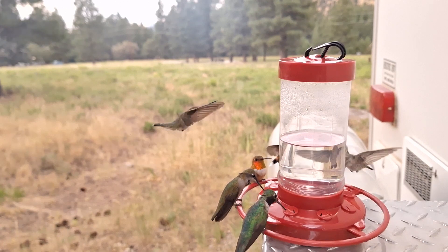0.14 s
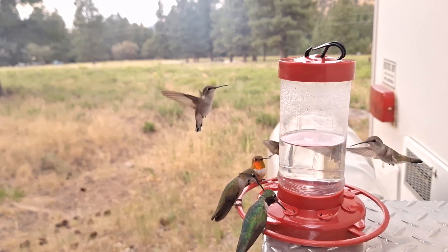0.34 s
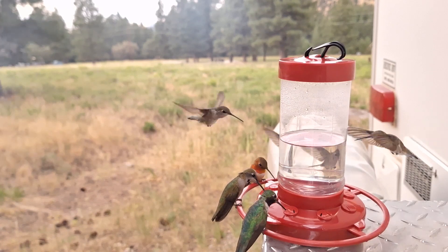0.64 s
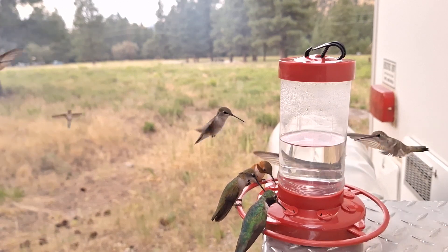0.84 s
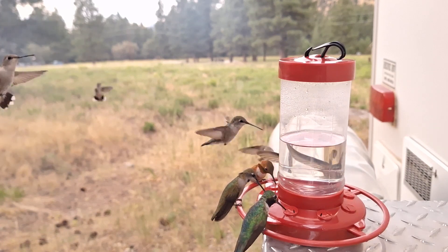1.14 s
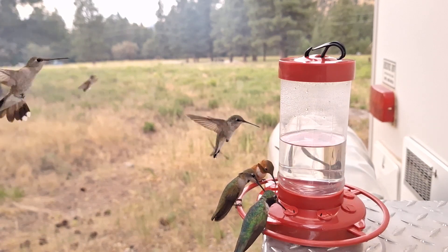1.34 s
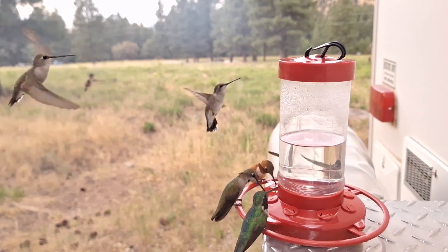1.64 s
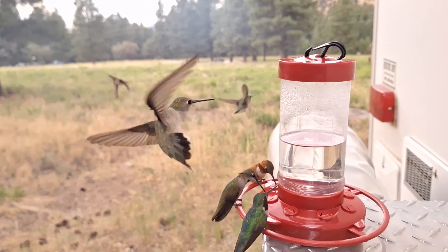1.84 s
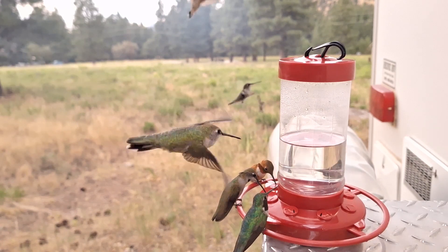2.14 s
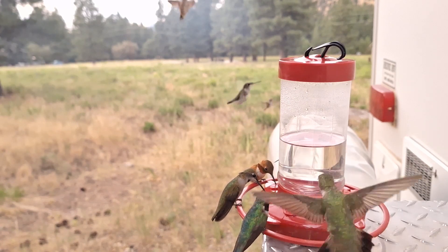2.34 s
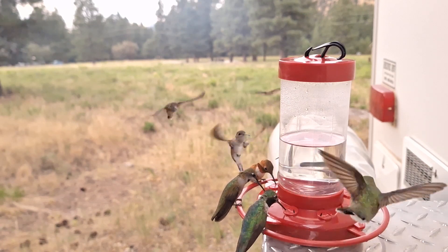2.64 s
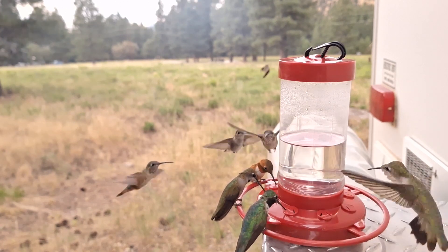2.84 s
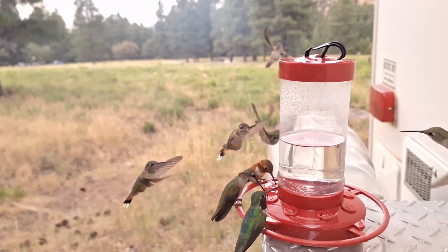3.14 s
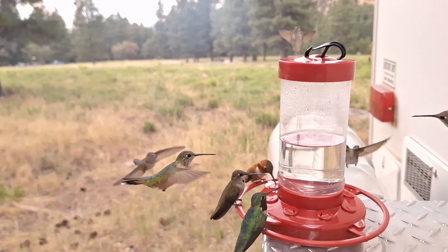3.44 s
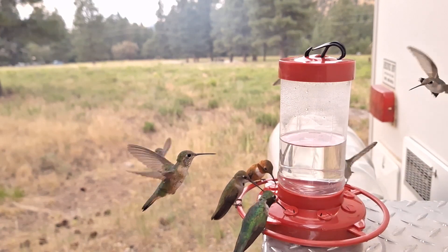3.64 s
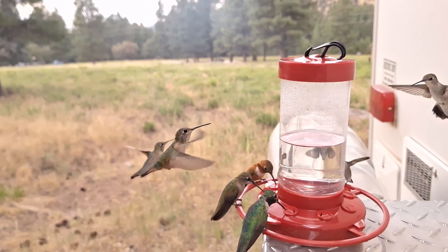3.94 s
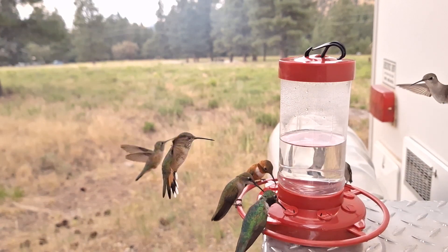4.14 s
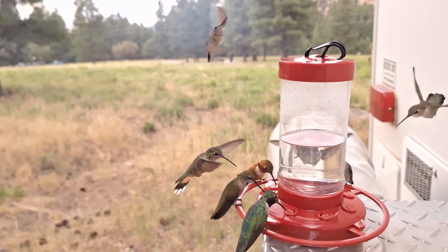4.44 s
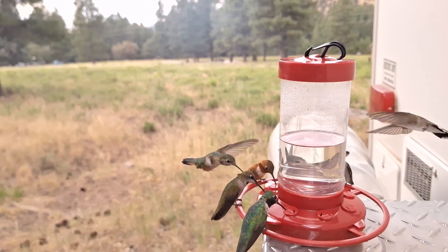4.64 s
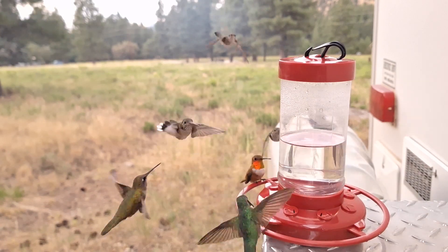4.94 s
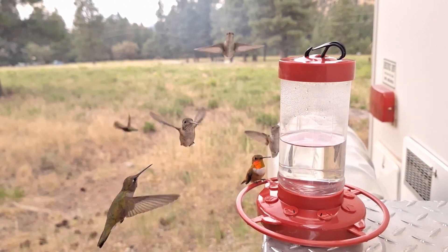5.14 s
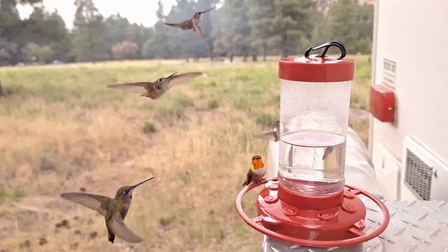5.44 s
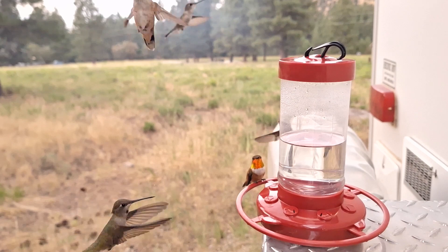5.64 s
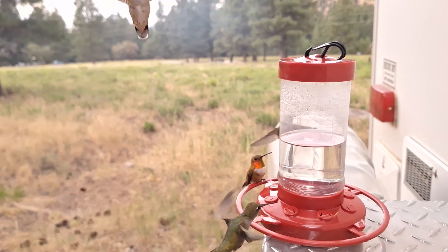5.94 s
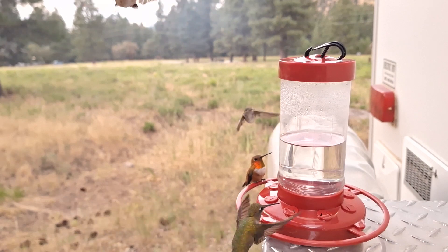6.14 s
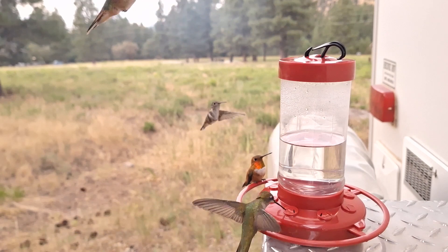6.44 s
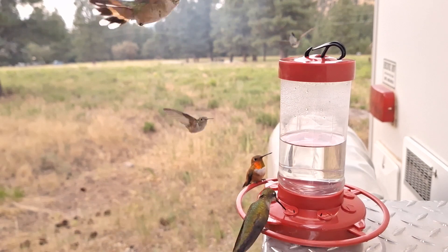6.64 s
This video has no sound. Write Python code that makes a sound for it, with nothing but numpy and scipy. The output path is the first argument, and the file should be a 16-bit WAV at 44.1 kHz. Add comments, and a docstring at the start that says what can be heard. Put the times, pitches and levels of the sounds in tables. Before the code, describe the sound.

Outdoors, a close microphone by a feeder catches overlapping hummingbird wings: low buzzing drones, throbbing bass flutters and puffs of turbulent air. A small wing tick comes early. Tiny piercing chips, each plunging in pitch, mix with duller reedy chups. A dry rattle of striking feathers leads into a bright, high whirring trill that starts abruptly and recedes with slight echo. Faint distant whistles and a gentle meadow hiss lie behind.

```python
"""Hummingbirds at a feeder

Hummingbirds crowd a feeder beside a meadow: wings hum at twice their beat and throw gusts of turbulent air.
The birds scold with whistled chips of plunging pitch and lower, reedy chups rich in harmonics.
Wings flick early on and later clash in a scuffle; a male then flies by, his wingtip feathers
whistling on every beat. Faint whistles sound farther off, over feather hiss and a steady meadow hiss."""
import sys
import numpy as np
from scipy import signal
from scipy.fft import rfft, irfft, next_fast_len
from scipy.io import wavfile
from scipy.ndimage import uniform_filter1d

SR = 44100
rng = np.random.default_rng(int(sys.argv[2]) if len(sys.argv) > 2 else 0)


def master_out(mix):
    """Clip the mix to full scale and print it as 16-bit PCM to the path in sys.argv[1]."""
    frames = np.transpose(np.atleast_2d(mix))
    ceiling = np.clip(frames, -1, 1)
    pcm = np.round(ceiling * 32767).astype(np.int16)
    wavfile.write(sys.argv[1], SR, pcm)


N = 298998
TIME = np.arange(N) / SR  # seconds
TAU = 2 * np.pi
SIDES = np.array([[1], [-1]])  # left port, right port
EDGE_HZ = 15900  # upper limit of the band


def hover(hum_db=-4.0, arrive_s=0.043, leave_s=0.0753, slowing=0.044, waiting_db=-48, waiting_hz=90.94):
    """Incoherent sources add in power; the hum takes their power-weighted pitch, so the nearest bird rules."""
    # Birds hovering close by. Each row: arrival in seconds, stay in seconds, level in dB before the
    # hum gain, hum pitch in Hz at mid-stay.
    visit_rows = [(.01, 0.42, -45.5, 91), (0.491, 0.38, -40, 83.8), (1.069, 0.19, -37.5, 96.83),
                  (1.68, 0.29, -36, 87.85), (1.879, 0.32, -39, 95.15), (2.189, 0.69, -39.5, 92.3),
                  (2.949, 0.43, -39.5, 93.33), (3.456, 0.32, -35, 91.6), (3.76, 0.39, -42, 86.6),
                  (4.26, 0.49, -39, 88.04), (4.699, 0.33, -34.5, 86.46), (5.001, 0.95, -39.5, 86.53),
                  (6.04, 0.6, -39, 84.33)]
    # one bird waits its turn farther off throughout
    power = np.full(N, amp(waiting_db) ** 2)
    pitch_sum = power * waiting_hz
    for start, stay, db, mid_hz in visit_rows:
        t = TIME - start
        near_power = (amp(db) * ramps(t, stay, arrive_s, leave_s)) ** 2
        # the wingbeat slows by this share over the stay
        pitch = mid_hz * (1 + slowing * (.5 - t / stay))
        power = power + near_power
        pitch_sum = pitch_sum + near_power * pitch
    return amp(hum_db) * np.sqrt(power) * hum(pitch_sum / power)


def hum(hz, beat_db=-14, upper_db=-13, fall_db=5, rival_db=-7, flutter_db=4.0, wander=0.03494):
    """Near-equal up- and downstrokes double the beat frequency; a rival's lower hum interferes with it."""
    beat = np.pi * np.cumsum(hz * (1 + wander * drift(9.7))) / SR  # phase of the wingbeat, half the hum
    rival = TAU * np.cumsum(hz * (.84 + .1 * drift(5))) / SR + .5 * SIDES * drift(2)
    wave = np.cos(2 * beat) + amp(beat_db) * np.cos(beat + drift(1.5)) + amp(rival_db) * np.cos(rival)
    # upper harmonics of the beat, strongest at the fourth
    for k in range(3, 8):
        wave += amp(upper_db - fall_db * abs(k - 4)) * np.cos(k * beat + drift(10.8))
    return np.sqrt(2) * amp(flutter_db * drift(34.2)) * wave


def flock(wings_db=1, wander=.06, swell_db=3, air_db=-9.0, puff=0.19):
    """Periodic wing pressure forms a harmonic series; each stroke also modulates turbulent air noise."""
    # The rest of the flock. Each row: time in seconds, level in dB before the wing or air gain.
    level_rows = [(0.0, -41.5), (0.94, -46), (1.47, -49.5), (2.81, -43), (2.87, -49), (3.12, -41),
                  (4.06, -51), (4.7, -44), (4.83, -36.5), (4.97, -44.5), (5.67, -47.5), (6.25, -45),
                  (6.78, -52)]
    # Wingbeat of each of these birds, in Hz.
    beat_rates = [40.15, 43.65, 45.83, 50.95]
    # A wing's pressure wave. Each row: multiple of the wingbeat, relative level in dB.
    wing_harmonics = [(1, -3), (2, 3), (4, -6.5), (14, -29.5)]
    # Spectrum of the fanned air. Each row: frequency in Hz, relative density in dB per Hz.
    air_spectrum = [(30, 1), (130, 22), (500, 5), (800, -3), (1400, -8.5), (2600, -16), (4500, -13.5)]
    level_db, = curve(level_rows)
    wings, puffs = silence(), np.zeros(N)
    for hz in beat_rates:
        beat = TAU * np.cumsum(hz * (1 + wander * drift(4))) / SR
        bearing = 0.39 * drift(0.91) * SIDES  # phase difference between ports as the bird turns
        wave = 0
        for k in range(1, 11):
            wave = wave + amp(read(wing_harmonics, k)) * np.cos(k * beat + drift(15.0) + bearing)
        wings += wave * amp(swell_db * drift(9.5))
        puffs += np.cos(2 * beat) + np.cos(beat)
    air = noise(air_spectrum) * np.exp(puff * evened(puffs))
    return amp(level_db + wings_db) * evened(wings) + amp(level_db + air_db) * air


def swerves(half_s=0.053, stroke_hz=92, puff=0.53, level_db=-1):
    """Turbulence shed in a hard turn is a short noise burst, amplitude-modulated by the wing strokes."""
    # Swerving birds. Each row: centre in seconds, level in dB before the gust gain.
    swerve_rows = [(.96, -56.5), (1.13, -51), (1.914, -51), (2.322, -51), (2.7, -64), (3.551, -54.5),
                   (4.841, -63)]
    # Spectrum of a gust. Each row: frequency in Hz, relative density in dB per Hz.
    gust_spectrum = [(60, -30), (180, 3), (420, 9.5), (800, -10.5), (2500, -17.5)]
    gusts = sum(amp(db) * np.exp(-((TIME - s) / half_s) ** 2) for s, db in swerve_rows)
    strokes = evened(np.exp(puff * np.cos(TAU * stroke_hz * TIME + drift(6.7))))
    return amp(level_db) * gusts * strokes * noise(gust_spectrum)


def passes(beat_hz=45, second_db=-9, third_db=-8):
    """In the near field of a wing, the fundamental of each whole beat outweighs its harmonics."""
    # Birds brushing past the microphone. Each row: centre in seconds, half length in seconds,
    # level in dB of the fundamental.
    pass_rows = [(2.34, 0.11, -48), (2.685, 0.83, -45), (3.216, 0.16, -48), (6.201, 0.33, -40.5)]
    beat = TAU * beat_hz * TIME + 0.91 * drift(16.4) + 0.081 * SIDES
    nearness = sum(amp(db) * np.exp(-((TIME - s) / half) ** 2) for s, half, db in pass_rows)
    wave = np.cos(beat) + amp(second_db) * np.sin(2 * beat) + amp(third_db) * np.cos(3 * beat)
    return np.sqrt(2) * nearness * wave


def chips(level_db=0.0, rise=0.0015, fade=0.023, step_db=8.5, bloom=0.0046, rasp=0.29, shimmer_db=5.0,
          breath_db=-13, knee_hz=5000, low_hz=2450, plunge_s=0.0029, glide_s=0.012):
    """Frequency modulation: a breathy whistle plunges to a knee, then glides lower; harmonics bloom after onset."""
    # Each row: start in seconds, level in dB before colouring, overtone level in dB,
    # starting pitch in Hz, length in seconds.
    chip_rows = [(0.0155, -51.5, -5.5, 8010, 0.039), (0.14, -57.5, -5, 6010, 0.03),
                 (0.751, -54.5, -3, 7400, 0.037), (1.661, -56, -3.5, 5588, .026),
                 (1.84, -58, -2.5, 6940, 0.028), (2.045, -51, -3, 7463, .026), (2.287, -48, -4, 7900, .028),
                 (2.3099, -42, -10, 7530, 0.021), (2.547, -53.5, -1.5, 5400, 0.026),
                 (2.581, -55.5, -13, 8057, 0.031), (2.649, -52.5, -2, 8400, 0.032),
                 (2.922, -50, -4.5, 8630, 0.028), (3.02, -55.5, -1.5, 7517, 0.027),
                 (3.205, -48, -5.5, 5892, 0.024), (3.508, -49.5, -2.5, 5865, .019),
                 (3.625, -52.5, -7, 7500, 0.031), (3.654, -45.5, -22, 6460, 0.025),
                 (3.977, -55.5, -1.5, 6318, .018), (4.205, -56.5, -11, 7560, 0.037),
                 (4.236, -48, -12.5, 8034, 0.03), (4.407, -49, -1.5, 6362, 0.017),
                 (5.201, -53.5, -11, 7980, 0.023), (6.6955, -48, -2.5, 8833, 0.027)]
    out = silence()
    for s, db, overtone_db, top_hz, length in chip_rows:
        t = port_times(length)
        plunge = (top_hz - knee_hz) / (1 + (t / plunge_s) ** 2)
        glide = (knee_hz - low_hz) * np.exp(-t / glide_s)
        hz = low_hz + glide + plunge
        turn = TAU * np.cumsum(hz * np.gradient(t, axis=1), axis=1) + rasp * quiver(t, size=24)
        overtones = 0
        for i, k in enumerate(range(2, 6)):
            level = amp(overtone_db - step_db * i + shimmer_db * quiver(t))
            overtones = overtones + level * np.sin(k * turn) * (k * hz < EDGE_HZ)
        breath = amp(breath_db) * rng.standard_normal(t.shape)
        wave = np.sin(turn) + np.minimum(t / bloom, 1) * overtones + breath
        add(out, s, glance(amp(db + level_db) * ramps(t, length, rise, fade) * wave))
    return colour(out, [(2400, -6), (4200, 4.5), (6000, 8.0), (8500, 11.5), (15000, 4.5)])


def chups(level_db=0.5, length=.02, rise=0.0029, fade=0.0024, sag=0.188, rasp=0.11, shimmer_db=4.0,
          breath_db=-10):
    """A reedy source is a harmonic series of uneven strength, here with breath noise and a drooping pitch."""
    # Each row: time in seconds, level in dB before the chup gain, starting pitch in Hz,
    # overtone level in dB.
    chup_rows = [(0.027, -54.5, 1977, -3.5), (.125, -55, 1877, -2), (0.607, -55.5, 1948, 0),
                 (.992, -53.5, 2072, -7.5), (1.081, -57.5, 1873, -2), (1.717, -61.5, 1840, 3.5),
                 (1.815, -64.5, 1897, 3), (2.213, -67.5, 1813, -6), (2.427, -59, 1949, 0.5),
                 (2.533, -56.5, 1945, -3), (3.159, -52.5, 1933, -5.5), (5.851, -56.5, 2040, -3.5),
                 (5.961, -56.5, 2070, -2.5)]
    # Relative levels in dB of the overtones, from the second harmonic up.
    reed_levels = [2, 3.5, 0.5, -5, -4]
    out = silence()
    for s, db, hz, overtones_db in chup_rows:
        t = port_times(length)
        # pitch falls with the square of time, by the share sag at the end
        turn = TAU * hz * t * (1 - sag / 3 * (t / length) ** 2) + rasp * quiver(t, size=20)
        reed = sum(amp(d + shimmer_db * quiver(t)) * np.sin(k * turn) for k, d in enumerate(reed_levels, 2))
        breath = amp(breath_db) * rng.standard_normal(t.shape)
        wave = np.sin(turn) + amp(overtones_db) * (reed + breath)
        add(out, s - .002, glance(amp(db + level_db) * ramps(t, length, rise, fade) * wave))
    return out


def trill(level_db=-1, octave_db=-28, lean_db=3.0, breath_db=-21):
    """Aeroelastic flutter: narrow wingtip feathers snap into a whistle, rising in pitch, once a wingbeat."""
    # The male's flight. Each row: time in seconds, whistle level in dB before the gains.
    flight_rows = [(5.158, -63), (5.2, -31.5), (5.38, -36.5), (5.55, -41), (5.62, -48), (5.75, -44.5),
                   (6.12, -60.5), (6.28, -50.5), (6.7, -65)]
    # The whistle through one beat. Each row: share of the beat, relative level in dB, pitch in Hz.
    stroke_rows = [(0, -16, 5790), (.05, 5, 5730), (.22, 3.5, 5810), (.4, -3, 6210), (.62, -14, 6080),
                   (1, -16, 5790)]
    # His wingbeat. Each row: time in seconds, rate in Hz.
    beat_rows = [(5.1575, 45), (5.3, 42.2), (5.55, 42.7), (6.0, 44.6), (6.2, 41.5)]
    db, = curve(flight_rows)
    flying = (TIME > flight_rows[0][0]) & (TIME < flight_rows[-1][0])
    beat_hz, = curve(beat_rows)
    beats = np.cumsum(beat_hz * (TIME > beat_rows[0][0])) / SR
    stroke_db, hz = curve(stroke_rows, beats % 1)
    turn = TAU * np.cumsum(hz * (1 + .015 * quiver(TIME))) / SR + SIDES * (.89 + .3 * drift(10))
    breath = noise([(6200, -2), (10000, -15)])
    whistle = np.sin(turn) + amp(octave_db) * np.sin(2 * turn) + amp(breath_db) * breath
    wave = flying * whistle * amp(level_db + stroke_db + 1.0 * drift(32))
    # the feathers give off little below their lowest flutter pitch
    wave = colour(wave, [(4900, -30), (5500, 0)])
    # the echo fades half as fast, in dB, as he leaves
    echo = surroundings(wave * amp((db + db.max()) / 2), near_db=-15.5, far_db=-18)
    return wave * amp(db + lean_db * SIDES) + echo


def flicks(tick_s=.00082, thwack_s=0.00073, scrape_db=-17, scrape_s=0.032, crackle_db=5):
    """Impact and friction: stiff feathers snap past each other with tick and thwack, then scrape as they part."""
    # Wings striking each other. Each row: time in seconds, bright tick level in dB,
    # dull thwack level in dB.
    flick_rows = [(0.198, -44, -53.5), (4.816, -45.5, -46.5), (4.837, -54, -39.5), (4.860, -35.5, -40),
                  (4.874, -41.5, -49), (4.912, -36.5, -43.5)]
    out, t = silence(), TIME[:4000]
    for s, db, thwack_db in flick_rows:
        tick, body = rng.standard_normal((2, 2, len(t)))
        tick = evened(colour(tick, [(1000, -16), (8000, 11)])) * t / tick_s * np.exp(1 - t / tick_s)
        body = evened(colour(body, [(300, 6), (900, 11), (2400, 3), (8000, -26)]))
        thwack = t / thwack_s * np.exp(1 - t / thwack_s)
        scrape = amp(scrape_db) * evened(amp(crackle_db * quiver(t))) * np.exp(-t / scrape_s)
        add(out, s, amp(db) * tick + amp(thwack_db) * body * (thwack + scrape))
    return out


def far_trills(beat_hz=50, level_db=-7, sag_hz_per_s=600):
    """Other birds' feathers pipe in pulses at the wingbeat: a sagging tone, amplitude-modulated."""
    # Each row: start in seconds, end in seconds, starting pitch in Hz, level in dB before the gain.
    far_rows = [(1.146, 1.285, 2233, -58), (4.972, 5.502, 3962, -60)]
    out = silence()
    for s, end, hz, db in far_rows:
        t = port_times(end - s)
        turn = TAU * (hz - .5 * sag_hz_per_s * t) * t
        pulses = np.exp(2.5 * np.cos(TAU * beat_hz * t) + .25 * quiver(t, size=300))
        wave = evened(pulses * np.sin(turn + quiver(t, size=85)))
        swell = np.sin(np.pi * np.sqrt(t / (end - s)))  # quick rise, slower fade
        add(out, s, amp(db + level_db) * wave * swell)
    return out


def hiss(feather_db=4, meadow_db=-71, flicker_db=2.5):
    """Broadband noise: flickering treble hiss from feathers over the steady hiss of the meadow."""
    # Feather hiss. Each row: time in seconds, level in dB before the feather gain.
    feather_rows = [(0, -72), (1.55, -75.5), (2.1, -70.5), (4.9, -66.5), (5.5, -71.5), (6.4, -66.5),
                    (6.78, -71)]
    # Spectrum of the meadow. Each row: frequency in Hz, relative density in dB per Hz.
    meadow_spectrum = [(200, 17.5), (1000, 0), (2700, -2.5), (10000, -32)]
    db, = curve(feather_rows)
    fine = noise([(2000, -64), (5000, -9.5), (8500, -1.5), (15500, 3.5)])
    feathers = fine * amp(db + feather_db + flicker_db * drift(41))
    return feathers + amp(meadow_db) * noise(meadow_spectrum)


def surroundings(x, near_db, far_db, near_t60=0.17, far_t60=0.41):
    """Exponentially decaying reverberation: quick scatter from feeder and wall, then a faint outdoor tail."""
    t = np.arange(SR // 2) / SR
    near, far = rng.standard_normal((2, 2, len(t)))
    scatter = amp(near_db) * evened(near * amp(-60 * t / near_t60))
    tail = amp(far_db) * evened(far * amp(-60 * t / far_t60))
    return signal.fftconvolve(x, (scatter + tail) / np.sqrt(len(t)), axes=1)[:, :N]


def glance(wave, db=-12, count=3, longest_s=.004):
    """Comb filtering: delayed reflections off bottle and wall make a call ripple as its pitch falls."""
    wave = np.pad(wave, [(0, 0), (0, round(longest_s * SR))])
    delays = rng.integers(1, round(longest_s * SR), (len(SIDES), count))
    reflections = [sum(np.roll(x, d) for d in row) for x, row in zip(wave, delays)]
    return wave + amp(db) * np.array(reflections)


def port_times(length, spread=.00007):
    """Interaural-style delay: the time at each port, in seconds, for a bird in a random direction."""
    return np.maximum(np.arange(0, length, 1 / SR) + SIDES * spread * rng.uniform(-1.5, 1), 0)


def noise(points):
    """Partial coherence: coloured noise at two ports, alike in the bass and unrelated in the treble."""
    # Each row: frequency in Hz, likeness of the ports (limited to 1 below).
    likeness = [(80, 3), (250, 1.17), (1100, 0.02)]
    size = next_fast_len(N)
    hz = np.fft.rfftfreq(size, 1 / SR)
    a, b = rfft(rng.standard_normal((2, size)))
    same = np.clip(read(likeness, hz), -1, 1)
    ports = np.array([a, same * a + np.sqrt(1 - same ** 2) * b])
    return evened(irfft(ports * amp(read(points, hz)), size)[:, :N])


def colour(x, points):
    """Linear filtering: multiplies the spectrum by a gain curve in dB."""
    size = next_fast_len(x.shape[-1] + 2000)
    gain = amp(read(points, np.fft.rfftfreq(size, 1 / SR)))
    return irfft(rfft(x, size) * gain, size)[..., :x.shape[-1]]


def drift(rate):
    """Low-passed random wander of rms 1, with its corner at rate in Hz."""
    hz = np.fft.rfftfreq(2048, TIME[-1] / 2047)
    slow = irfft(rfft(rng.standard_normal(2048)) / (1 + (hz / rate) ** 4))
    return np.interp(TIME, np.linspace(0, TIME[-1], len(slow)), evened(slow))


def quiver(t, size=60):
    """Twice-averaged noise of rms 1: fast unsteadiness over the times t, smoothed over size samples."""
    once = uniform_filter1d(rng.standard_normal(t.shape[-1]), size)
    return evened(uniform_filter1d(once, size))


def ramps(t, length, rise, fade):
    """Amplitude envelope of linear attack, hold and linear release."""
    return np.clip(t / rise, 0, 1) * np.clip((length - t) / fade, 0, 1)


def amp(db):
    """Decibel law: the amplitude ratio of a level in dB."""
    return 10 ** (np.asarray(db) / 20)


def evened(x):
    """Power normalisation: scales to rms 1."""
    return x / np.sqrt(np.mean(x ** 2) + 1e-20)


def curve(rows, at=TIME):
    """Linear interpolation of each column of a table over its first."""
    s, *columns = np.transpose(rows)
    return [np.interp(at, s, c) for c in columns]


def read(points, hz):
    """Linear interpolation of a spectrum on a log-frequency axis."""
    f, value = np.transpose(points)
    return np.interp(np.log(hz + 1), np.log(f + 1), value)


def silence():
    """Zero pressure at both ports."""
    return np.zeros((len(SIDES), N))


def add(mix, s, sound):
    """Superposition: adds a sound to the mix from s seconds on."""
    part = mix[:, max(round(s * SR), 0):][:, :sound.shape[-1]]
    part += sound[..., :part.shape[1]]


def scene():
    """Superposition of direct sound and echo: voices return dulled; distant whistles carry more echo."""
    voices, distant = chips() + chups() + flicks(), far_trills()
    echoes = colour(surroundings(voices, near_db=-8.5, far_db=-22.0), [(4000, 3.5), (9000, -7.0)])
    echoes += surroundings(distant, near_db=-9, far_db=-5)
    wings = hover() + flock() + swerves() + passes()
    return wings + hiss() + trill() + voices + distant + echoes


def record(dry):
    """Frequency response: each port has its own colour, then a bass cut and a band limit."""
    # Each row: frequency in Hz, left-right difference in dB.
    port_lean = [(200, 0.54), (6200, 3.5), (9500, -3.5)]
    dry = dry * signal.windows.tukey(N, .002)  # brief fades at both ends
    ports = []
    for x, side in zip(dry, (.5, -.5)):
        ports.append(colour(x, [(hz, side * db) for hz, db in port_lean]))
    bass_cut = signal.butter(6, 38, "high", fs=SR, output="sos")
    ports = signal.sosfilt(bass_cut, np.array(ports))
    band_limit = signal.firwin(511, EDGE_HZ, window=("kaiser", 9), fs=SR)
    return signal.oaconvolve(ports, band_limit[None], "same")


dry = scene()
out = record(dry)
master_out(out)
```